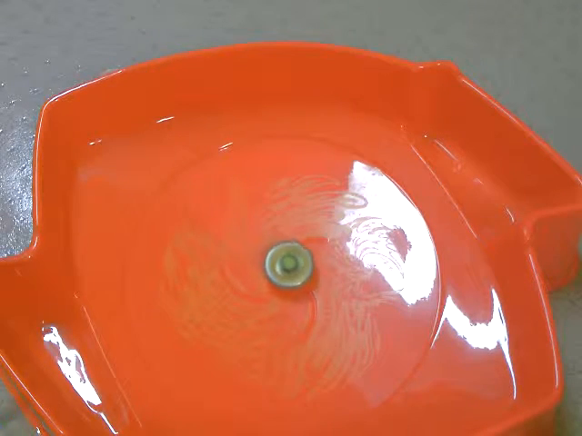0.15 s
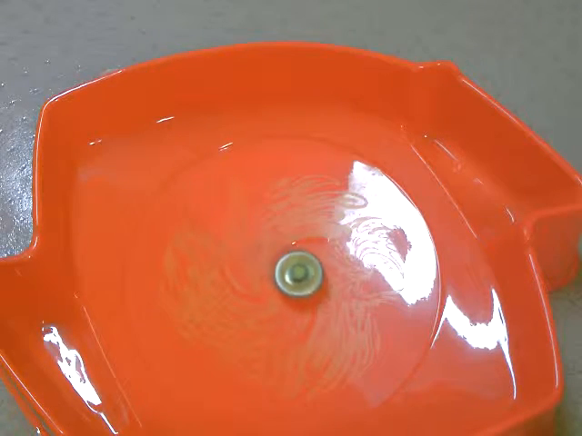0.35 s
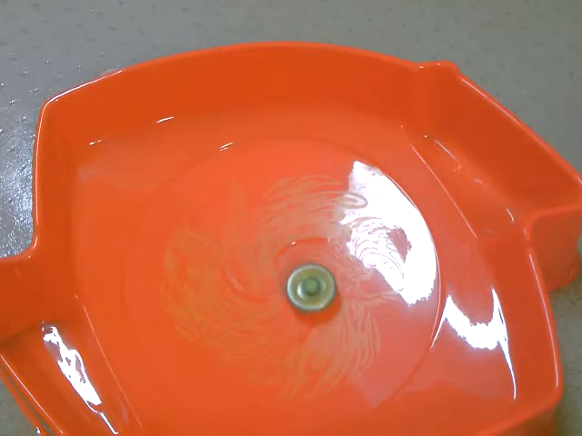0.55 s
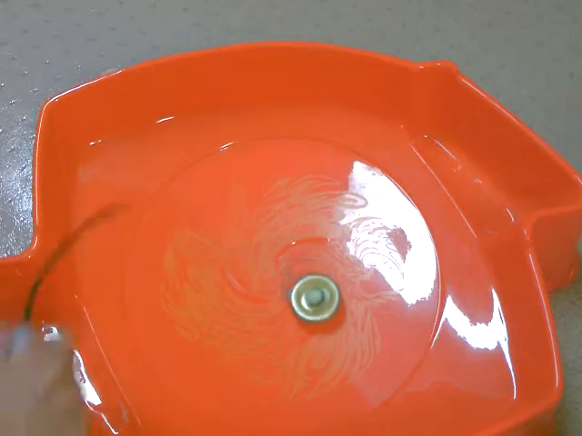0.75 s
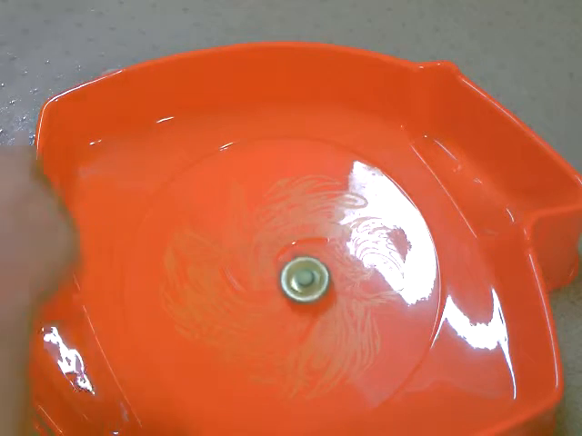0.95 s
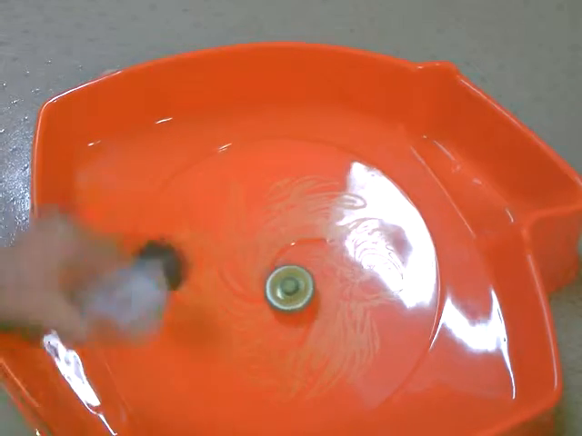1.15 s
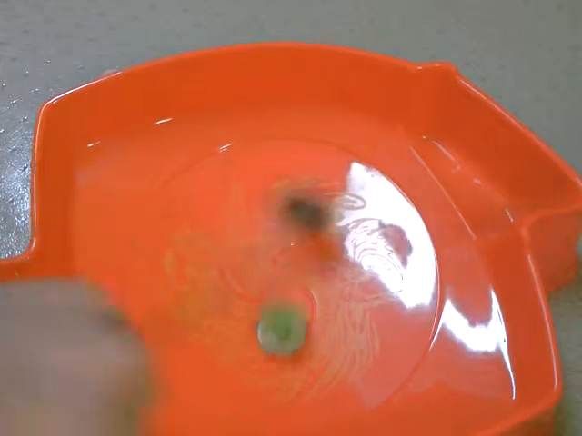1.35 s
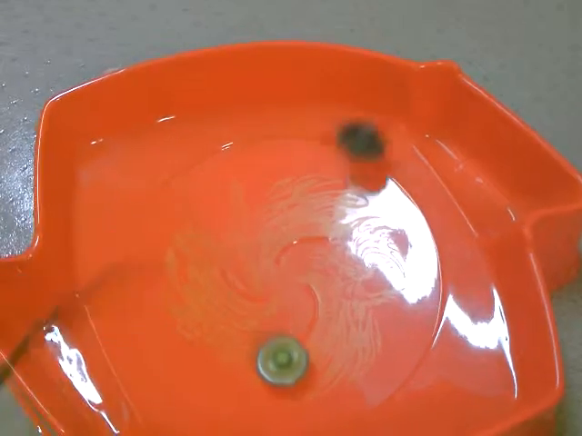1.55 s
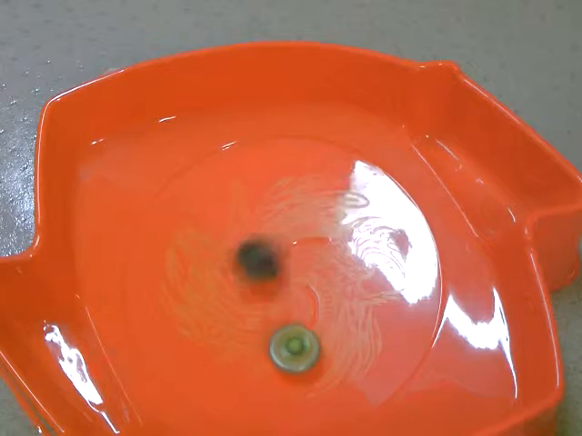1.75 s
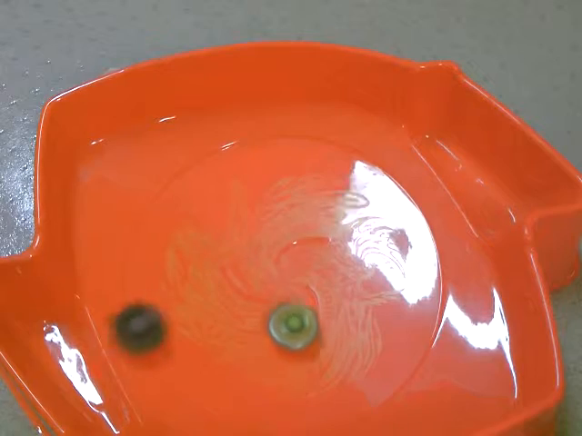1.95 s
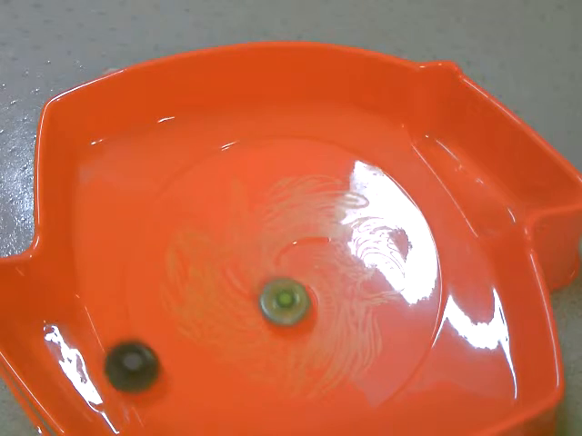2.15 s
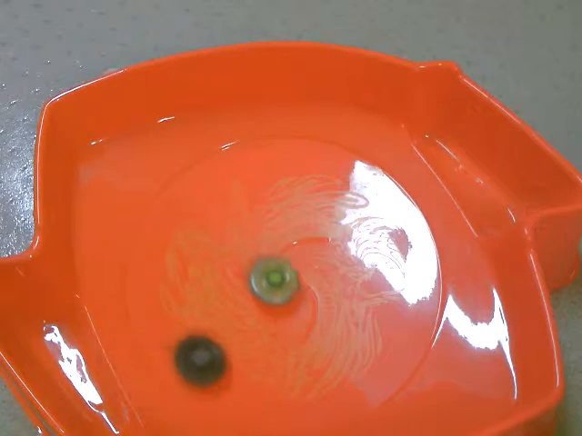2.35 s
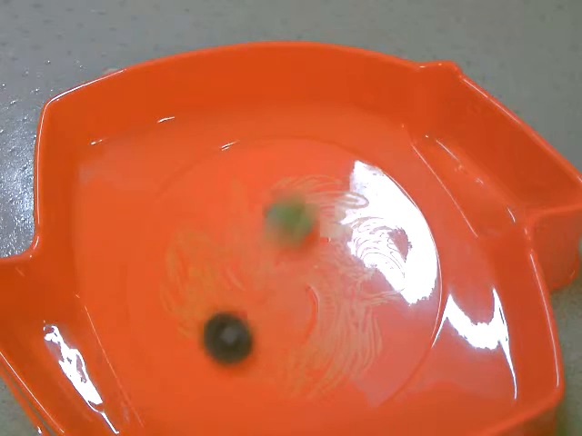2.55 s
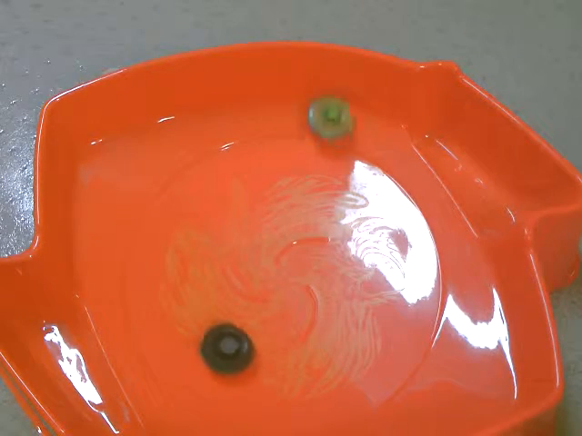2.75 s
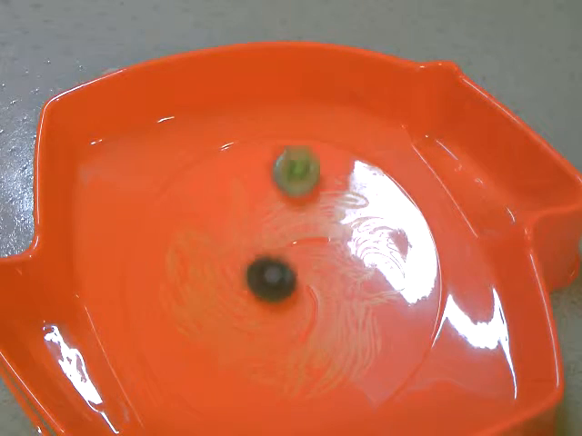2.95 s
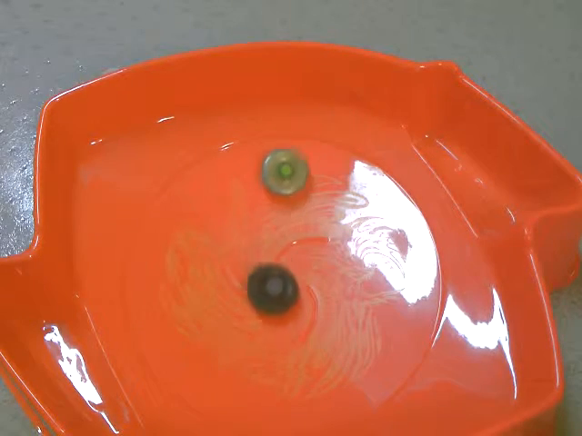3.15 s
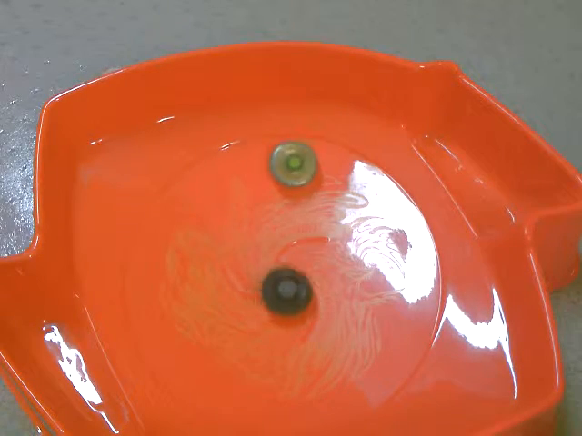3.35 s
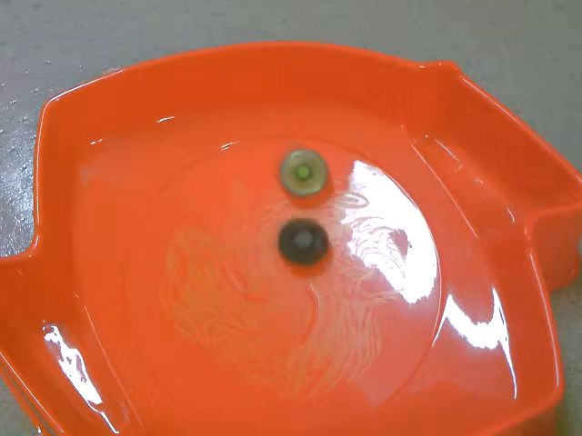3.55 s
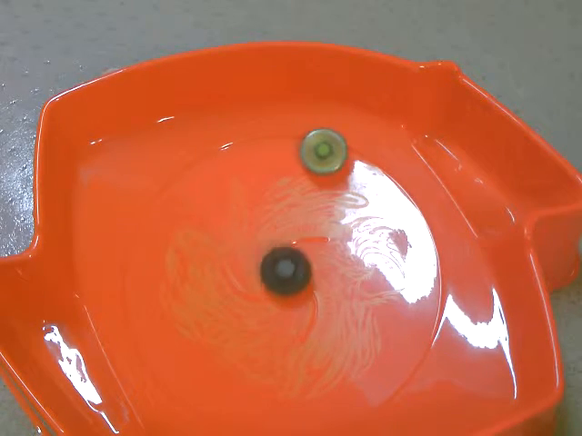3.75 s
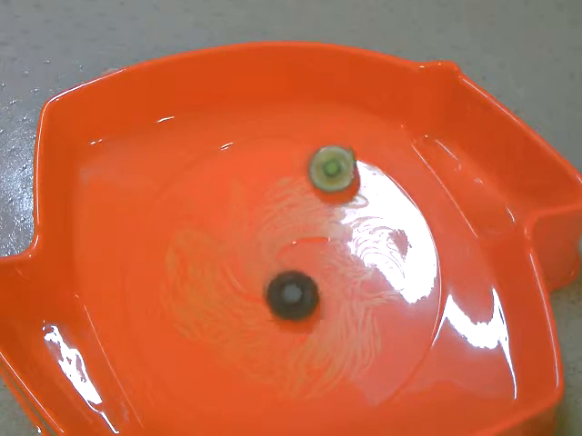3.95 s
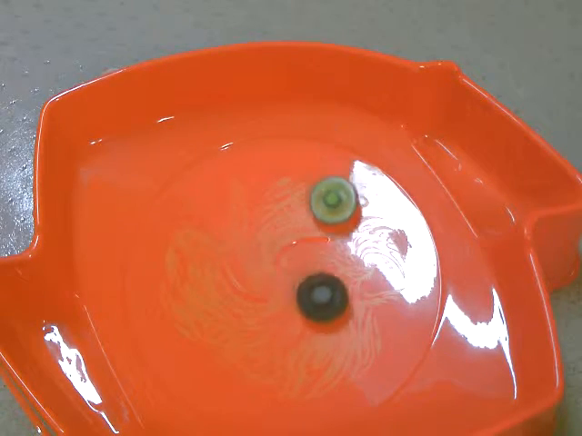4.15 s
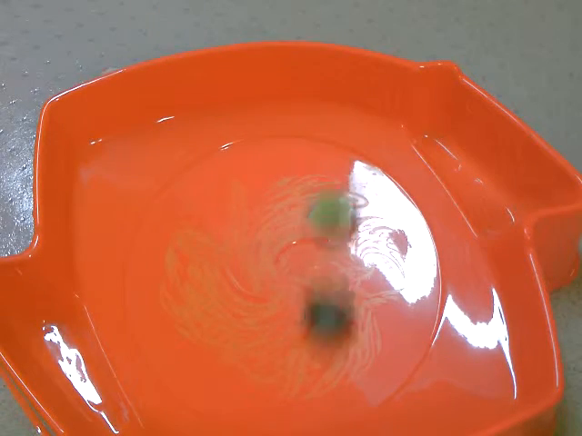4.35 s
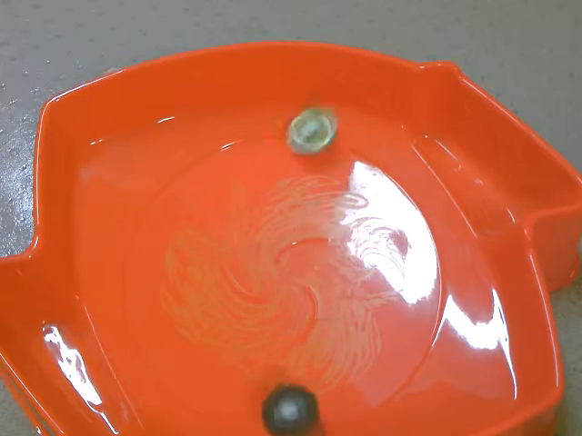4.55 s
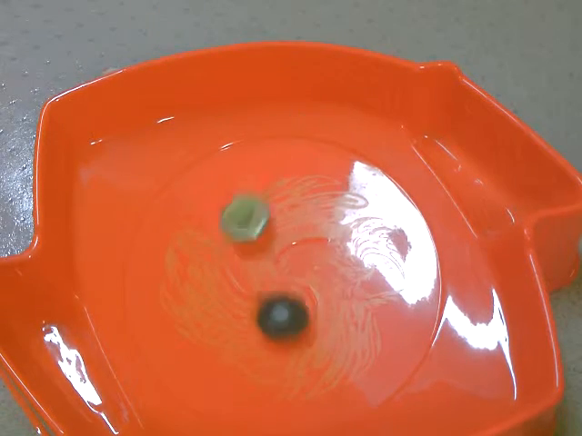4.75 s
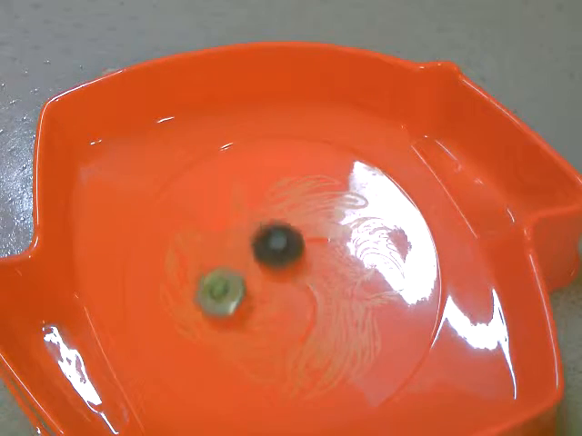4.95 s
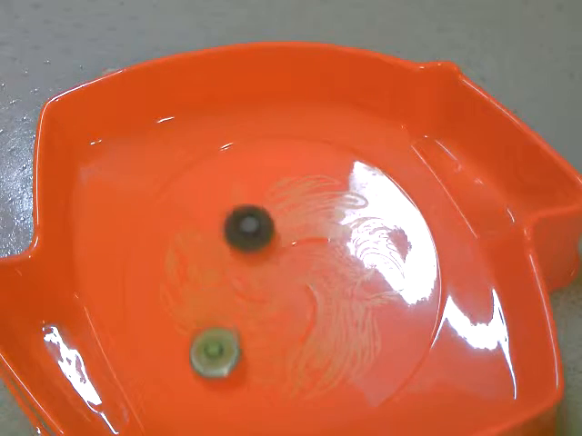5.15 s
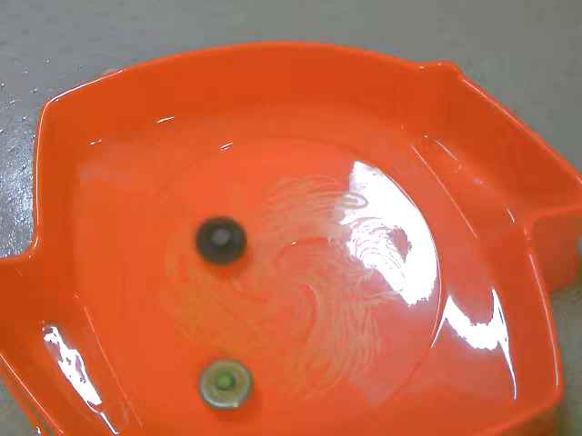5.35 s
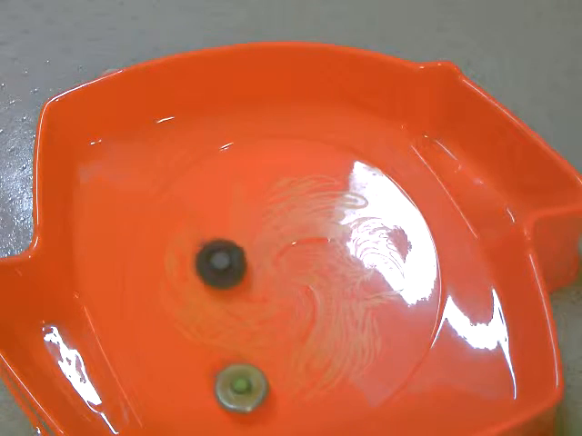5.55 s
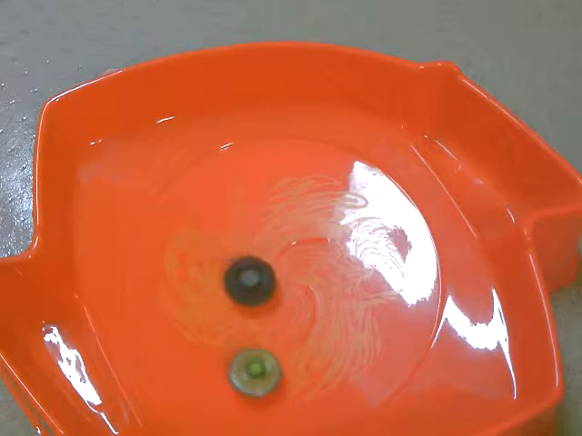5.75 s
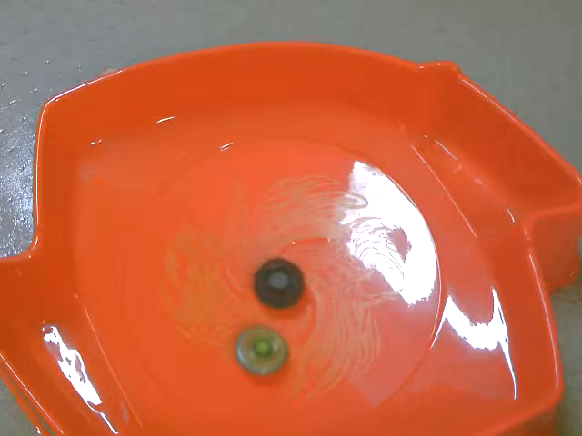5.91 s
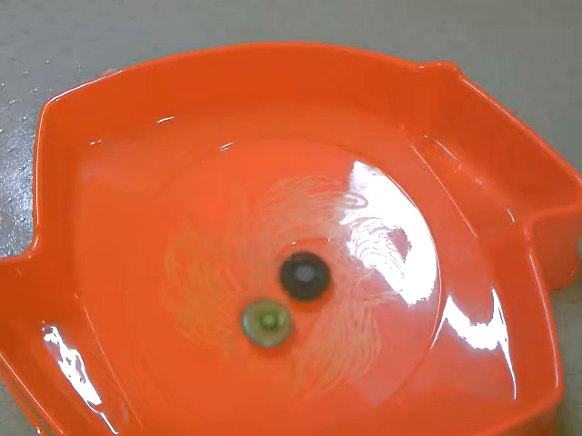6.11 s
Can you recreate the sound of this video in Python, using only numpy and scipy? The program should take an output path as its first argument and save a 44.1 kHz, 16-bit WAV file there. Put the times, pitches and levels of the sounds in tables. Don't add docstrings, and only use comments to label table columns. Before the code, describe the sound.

A small hard-walled room, heard closely through a thin little microphone with faint steady hiss. From 0 to 0.5 s a toothed strip is fed into a hollow plastic launcher: faint clicks, then a run of hard snaps from 0.25 to 0.42 with buzzing tails. A spinning top's tip ticks and rumbles softly on plastic until a very quick, bright ratcheting rip at about 1.2. The second top slams into the bowl at 1.27, with hollow knocks at 1.5, 1.6 to 1.7, 1.8 and 1.9, then weakening hops and rolling. Metal rims clash at 2.7, with bowl knocks to 3.0; again at 3.23, followed by rapid fluttering scuffs; a hard snap comes at 3.8. After near-quiet rolling, the last clash at 4.52 rings high and shimmering, then strong bowl thuds at 4.62 to 4.69 dwindle into pattering bounces until 5.5, leaving faint hum and a small tick near 5.8.

```python
import sys
import numpy as np
from scipy import signal
from scipy.fft import rfft, irfft
from scipy.io import wavfile

SR = 44100
rng = np.random.default_rng(int(sys.argv[2]) if len(sys.argv) > 2 else 0)


def amplitude_ratio(level_db):
    exponent = np.asarray(level_db, float) / 20
    return 10 ** exponent


def inscribe(sig):
    pcm = np.round(np.clip(np.atleast_2d(sig).T, -1, 1) * 32767)
    wavfile.write(sys.argv[1], SR, pcm.astype(np.int16))


N = 272538

# t/s, tooth rattle level/dB
RIP = [
    (1.17, -43.5),
    (1.238, -16),
    (1.25, -29.5),
    (1.28, -47),
]
# f/Hz, level/dB, time to fall 60 dB/s
BOWL = [(398.6, -8, 0.13), (493, -6, 0.21), (525, -2, 0.23), (568.5, 1.5, 0.12), (610, 1, 0.1),
        (675, 2.5, 0.052), (718, -5, 0.14), (710, 1.5, 0.099), (772, 3.5, 0.17), (830, -8, 0.19),
        (897, 11, 0.045), (970, -4.5, 0.057), (1030, -2.5, 0.055), (1010, 12, 0.028), (1067, 2, 0.14),
        (1200, 6.5, 0.027), (1240, -10.5, 0.068), (1294, 6.5, 0.062), (1607, 17, 0.0077)]
# f/Hz, level/dB, time to fall 60 dB/s
WALL = [(150, -15.5, 0.063), (225, -15, 0.06), (297.4, -17.5, 0.094)]


def rms_one(x):
    return x / np.sqrt(np.mean(x ** 2) + 1e-20)


def curve(rows):
    s, level_db = np.transpose(rows)
    return amplitude_ratio(np.interp(np.arange(N) / SR, s, level_db, left=-140, right=-140))


def ring(clicks, hz, t60):
    decay, turn = amplitude_ratio(-60 / (t60 * SR)), 2 * np.pi * hz / SR
    return signal.lfilter([0, np.sin(turn)], [1, -2 * decay * np.cos(turn), decay * decay], clicks + 1e-18)


def strike(times, levels_db, modes, spread_db):
    at = np.round(times * SR).astype(int)
    out = np.zeros(N)
    chance = rng.standard_normal((len(at), len(modes), 2))
    for k, (hz, mode_db, t60) in enumerate(modes):
        sign = np.where(chance[:, k, 1] > 0, 1, -1)
        clicks = np.zeros(N)
        clicks[at] = amplitude_ratio(levels_db + mode_db + spread_db * chance[:, k, 0]) * sign
        out += ring(clicks, hz, t60)
    return out


def snaps(times, levels_db, low_hz, high_hz, t60, rise_s):
    length = 4096
    out, t = np.zeros(N + length), np.arange(length) / SR
    shape = amplitude_ratio(-60 * t / t60) * np.minimum(t / rise_s, 1)
    band = signal.butter(2, [low_hz, min(high_hz, .45 * SR)], "band", fs=SR, output="sos")
    bursts = signal.sosfilt(band, rng.standard_normal((len(times), length)) * shape)
    for s, level_db, burst in zip(times, levels_db, bursts):
        start = round(s * SR)
        out[start:start + length] += amplitude_ratio(level_db) * burst / np.abs(burst).max()
    return out[:N]


def grains(per_s, uneven_db):
    sizes = amplitude_ratio(uneven_db * np.minimum(rng.exponential(1, N), 4)) * rng.choice([-1, 1], N)
    return sizes * (rng.random(N) < per_s / SR)


def notes(rows, rise_s):
    length = 16384
    out, t = np.zeros(N + length), np.arange(length) / SR
    for s, level_db, hz, t60 in rows:
        start = round(s * SR)
        fade = amplitude_ratio(level_db - 60 * t / t60) * np.minimum(t / rise_s, 1)
        out[start:start + length] += fade * np.sin(2 * np.pi * hz * t)
    return out[:N]


def pushes(times, levels_db, pitches_hz, swell_s):
    length = 2048
    out, t = np.zeros(N + length), np.arange(length) / SR
    for s, level_db, hz in zip(times, levels_db, pitches_hz):
        start = round(s * SR)
        swing = t / swell_s * np.exp(1 - t / swell_s) * np.sin(2 * np.pi * hz * t)
        out[start:start + length] += amplitude_ratio(level_db) * swing
    return out[:N]


def launcher():
    # t/s, peak level/dB, case ring level/dB, strip ring level/dB
    ratchet = [(0.0034, -30, -9, -15), (0.0114, -33, 3, -21), (0.022, -29, -15, -22),
               (0.03, -23.5, -8.5, -17), (0.0446, -30, -22, -19), (0.1777, -27, -10, -12),
               (0.182, -32, -8, -21), (0.2547, -8.5, -31, -13), (0.2569, -9, -17, -22),
               (0.2707, -5.5, -24, -21), (0.2966, -7.5, -27, -29), (0.3314, -9, -19, -31),
               (0.3683, -10, -22, -15), (0.413, -9, -26, -14), (0.4154, -16, -16, -3),
               (0.519, -31, -16, -30), (1.188, -31.5, -19.5, 1.5), (1.194, -47, -20.5, 0),
               (1.203, -36, 0, 11), (1.2082, -31, -18, 1.5), (1.2134, -20, -9, -6), (1.2214, -17, 0, -1),
               (1.224, -17, -7, -2), (1.2314, -21, -15, -16), (1.2334, -8.5, -10, -13),
               (1.2354, 0, -13, -15), (1.2374, -12.5, -17, 1.5), (1.244, -21, 4, -9), (1.252, -33, 7, -12)]
    # f/Hz, level/dB, time to fall 60 dB/s
    case_modes = [(1383, -26, 0.0065), (1570, 3.5, 0.013), (1746, 5.5, 0.0029)]
    # f/Hz, level/dB, time to fall 60 dB/s
    strip_modes = [(2524, -4.5, 0.02), (2970, -3, 0.023), (3340, -8, 0.022)]
    s, peak_db, case_db, strip_db = np.transpose(ratchet)
    treble_db = -23.5 + 0.89 * peak_db + 10 * (s > RIP[0][0])
    snap = snaps(s, peak_db - 5.5, 1510, 4860, t60=0.021, rise_s=0.00024)
    snap += snaps(s, treble_db + 6.0, 6000, 13000, t60=0.046, rise_s=0.00032)
    buzz = snaps(s, -20.5 + 0.8 * peak_db, 2000, 3500, t60=.09, rise_s=.002)
    case = strike(s, peak_db + case_db, case_modes, spread_db=1.0)
    strip = strike(s, peak_db + strip_db, strip_modes, spread_db=-0.5)
    teeth = grains(per_s=5100, uneven_db=0.0)
    rattle = rms_one(signal.lfilter(*signal.butter(2, [1300, 3800], "band", fs=SR), teeth))
    return snap + buzz + case + strip + slow_teeth() + amplitude_ratio(-7.5) * curve(RIP) * rattle


def slow_teeth():
    # t/s, case level/dB, case f/Hz, buzz level/dB, buzz f/Hz
    slow = [
        (0.18, -26, 1610, -44, 2700),
        (.2565, -26, 1900, -21, 2880),
        (0.2722, -12.5, 1670, -21, 3000),
        (0.2963, -11.5, 1560, -25, 2850),
        (0.3318, -15, 1510, -25.5, 2500),
        (0.3702, -14.5, 1880, -24, 2540),
        (0.4135, -12, 1760, -23, 2700),
    ]
    out = notes([(s, level_db, hz, .016) for s, level_db, hz, _, _ in slow], rise_s=0.00041)
    for s, _, _, buzz_db, hz in slow:
        out = out + snaps([s], [buzz_db], 0.835 * hz, 1.08 * hz, t60=0.15, rise_s=.002)
    return out


def clashes():
    # t/s, peak level/dB, rattle level/dB, pulse level/dB, level of the high blurred ring/dB
    hits = [
        (2.692, -11, -14, -9, -22.5),
        (3.2264, -7.5, -12.5, -14, -17.5),
        (3.8075, -4, -12, -10, -17),
        (4.519, -7, -22, -5, -14),
    ]
    # t/s, level/dB, f/Hz, time to fall 60 dB/s
    bodies = [(2.692, -24.5, 2220, 0.048), (2.692, -14.5, 3820, 0.014), (2.692, -29.5, 4440, 0.082),
              (2.692, -17, 6200, 0.035), (2.692, -39, 2560, .05), (3.2265, -28, 2890, 0.035),
              (3.2265, -43, 6400, 0.044), (3.2265, -37, 2250, 0.059), (3.2265, -37, 8200, 0.037),
              (3.808, -32.5, 2220, 0.076), (3.808, -23, 4080, 0.015), (3.808, -34, 6140, 0.036),
              (3.808, -49, 7550, 0.034), (3.808, -29, 9700, .02), (3.2265, -19, 9520, 0.03),
              (1.2125, -19, 2950, .03), (1.2215, -19.5, 1560, 0.039), (1.2345, -13.5, 1550, 0.027),
              (1.235, -4.5, 2630, 0.023), (1.238, -13, 3230, 0.029), (4.519, -25, 2908, 0.053),
              (4.519, -33, 2660, 0.1), (4.519, -28.5, 6500, 0.087), (4.519, -45, 7500, .04),
              (4.519, -36, 8600, 0.026), (4.519, -25, 9470, 0.044), (2.8595, -19.5, 2330, .02),
              (1.9, -24, 2920, 0.014), (1.677, -22, 1510, .03)]
    s, peak_db, rattle_db, pulse_db, cluster_db = np.transpose(hits)
    snap = snaps(s, peak_db, 2000, 10800, t60=0.0042, rise_s=0.00015)
    rattle = snaps(s, peak_db + rattle_db, 940, 6300, t60=0.011, rise_s=0.00037)
    cluster = snaps(s, cluster_db, 5400, 6200, t60=0.056, rise_s=0.001)
    contact_s = .0001
    pulse = pushes(s, pulse_db, s * 0 + 0.33 / contact_s, swell_s=contact_s)
    return snap + rattle + cluster + notes(bodies, rise_s=0.00026) + pulse


def rims():
    # t/s, level/dB, f/Hz, time to fall 60 dB/s
    rim_notes = [(2.692, -40, 5670, .16), (2.692, -44, 5755, .14), (3.808, -38, 5696, .2),
                 (3.808, -44, 5550, .2), (3.2265, -44, 5502, .3), (3.2265, -40, 5550, .28),
                 (3.2265, -48, 5599, .3), (3.2265, -48, 5642, .3), (3.2265, -35, 5690, .42),
                 (4.519, -45, 5405, .3), (4.519, -44, 5457, .25), (4.519, -30, 5490, .34),
                 (4.520, -30, 5503, .2), (4.521, -30, 5545, .3), (4.523, -33, 5588, .3),
                 (4.525, -37, 5636, .3), (4.519, -30, 5675, .36), (4.521, -36, 5690, .25)]
    return notes(rim_notes, rise_s=.003)


def knocks():
    # f/Hz, level/dB, time to fall 60 dB/s
    tip_modes = [(2330, -7, 0.033), (2850, -3.5, 0.019), (3860, -2, 0.0079)]
    # t/s, level/dB, f/Hz, time to fall 60 dB/s
    drums = [(1.496, -37, 293, .33), (1.27, -14, 480, .05), (1.288, -22, 330, .08),
             (1.6225, -11, 1010, .045), (1.627, -22, 400, .07), (1.632, -22, 490, .08),
             (1.68, -16, 630, .04), (1.79, -24, 950, .03), (1.9, -28, 950, .05), (1.907, -30, 560, .04),
             (2.859, -24, 900, .03), (2.862, -28, 480, .08), (2.9395, -13, 680, .04),
             (2.951, -22, 1500, .05), (2.94, -22, 1450, .03), (2.951, -26, 1050, .04),
             (3.0285, -20, 640, .05), (3.04, -36, 560, .15), (4.6175, -14, 750, .04),
             (4.622, -24, 560, .06), (4.675, -12, 680, .04)]
    # t/s, level/dB, f/Hz, time to fall 60 dB/s
    chatter = [(1.975, -33, 1256, .05), (2.02, -36, 770, .05), (2.09, -35, 1010, .03),
               (2.236, -32, 940, .03), (2.343, -35, 1000, .03), (2.362, -40, 900, 0.033),
               (2.551, -43, 890, 0.032), (4.752, -31, 600, 0.037), (4.8, -32, 640, .04),
               (4.817, -29, 1060, .03), (4.845, -30, 1010, .03), (4.872, -31, 1090, .04),
               (4.92, -33, 895, 0.027), (4.966, -34, 800, 0.036), (5.025, -42, 905, .03),
               (5.07, -36, 990, .04), (5.135, -37, 1040, .03), (5.23, -43, 950, .03),
               (5.253, -43, 1000, .03), (5.37, -48, 900, .03)]
    s, thud_db, clack_db, tick_db, wall_db, hz = contacts()
    push = pushes(s, thud_db - 4.5, hz, swell_s=0.0018)
    modes = strike(s, thud_db - 21.5, BOWL, spread_db=1.5) + strike(s, wall_db + 0.5, WALL, spread_db=0.0)
    soft = signal.lfilter(*signal.butter(2, 1500, fs=SR), modes)
    clack = snaps(s, clack_db + 2.0, 900, 2820, t60=0.043, rise_s=0.00054)
    tick = snaps(s, tick_db - 0.5, 3500, 13400, t60=0.014, rise_s=0.0001)
    stem = strike(s, tick_db - 8.5, tip_modes, spread_db=6.5)
    return push + soft + clack + tick + stem + notes(drums + chatter, rise_s=0.00062)


def contacts():
    # t/s, thud level/dB, clack level/dB, tick level/dB, push f/Hz
    slams = [(1.2665, -12.5, -25, -42, 430), (1.273, -9, -42, -41, 710), (1.286, -13, -34, -46, 760),
             (1.488, -23.5, -58, -14, 1090), (1.494, -20, -38, -19, 1030), (1.622, -15, -16, -19.5, 895),
             (1.626, -7.5, -48, -26, 688), (1.677, -12.5, -15.5, -17, 830), (1.68, -14.5, -25, -21, 615),
             (1.79, -14, -28.5, -28.5, 615), (1.9, -29, -29.5, -38, 830), (1.907, -23, -63, -69, 1040),
             (2.704, -37.5, -34, -47, 570), (2.737, -54, -31.5, -36, 596), (2.851, -26, -44, -61, 616),
             (2.859, -29, -29, -30, 480), (2.859, -16, -52, -46, 610), (2.902, -32, -36.5, -39, 940),
             (2.938, -18, -17, -25.5, 675), (2.941, -17, -23.5, -21.5, 685), (3.028, -24, -38.5, -68, 616),
             (4.6172, -12, -23.5, -32, 720), (4.6422, -12, -23.5, -31, 553),
             (4.671, -43, -13.5, -22.5, 1080), (4.675, -5, -30, -23, 610), (4.686, -12.5, -60, -27, 644)]
    # t/s, thud level/dB, tick level/dB, push f/Hz
    bounces = [(1.964, -25.5, -39, 960), (2.009, -27, -40, 1036), (2.038, -32, -68, 774),
               (2.069, -34, -46, 800), (2.102, -38, -70, 1030), (2.151, -30.5, -43, 1030),
               (2.191, -31.5, -58, 1010), (3.07, -33.5, -97, 525), (3.113, -32, -46, 1084),
               (3.139, -35, -73, 790), (4.785, -24, -31, 570), (4.855, -28.5, -38.5, 940),
               (4.909, -26, -68, 1000), (4.954, -29, -62, 1120), (4.985, -31.5, -64, 820),
               (5.041, -36.5, -52, 990), (5.061, -26.5, -41, 924), (5.119, -34, -46, 1010),
               (5.168, -36.5, -47, 910)]
    # t/s, thud level/dB, push f/Hz
    trips = [(0.552, -40, 470), (0.648, -43, 603), (0.773, -31, 950), (0.851, -35, 860), (0.934, -38, 1030),
             (0.962, -35.5, 530), (2.462, -41, 805), (2.468, -27.5, 730), (2.512, -47, 880),
             (2.583, -50, 666), (2.595, -37.5, 465), (2.62, -39, 470), (2.64, -38.5, 610),
             (3.854, -37, 1060), (4.292, -36.5, 840), (5.794, -39.5, 970)]
    # t/s, level/dB
    flexes = [(1.267, -21), (1.488, -15.5), (1.622, -9.5), (1.677, -15), (1.79, -23), (1.9, -19),
              (1.964, -24), (2.009, -29), (2.038, -32), (2.859, -30), (2.938, -30), (4.292, -41),
              (4.675, -13), (4.785, -25), (5.061, -35.5), (5.793, -40)]
    rows = slams + [(s, thud, thud - 7, tick, hz) for s, thud, tick, hz in bounces]
    rows += [(s, thud, thud - 7.5, thud - 41, hz) for s, thud, hz in trips]
    in_order = sorted(rows, key=lambda row: round(row[0], 2))
    s, thud_db, clack_db, tick_db, hz = np.transpose(in_order)
    wall_db = thud_db - 15.5
    for at, flex_db in flexes:
        wall_db[np.argmin(np.abs(s - at))] = flex_db
    return s, thud_db, clack_db, tick_db, wall_db, hz


def rolling():
    # t/s, peak level/dB
    scuffs = [(3.309, -49), (3.3352, -34.5), (3.3603, -40), (3.3834, -35.5), (3.4054, -50), (3.4296, -39),
              (3.454, -39), (3.4775, -41), (3.5004, -39.5), (3.5234, -42), (3.5453, -40), (3.569, -42),
              (3.5912, -46), (3.6132, -44.5), (3.6374, -45), (3.6586, -50), (3.7289, -55), (3.7539, -54),
              (3.7784, -41.5), (3.9724, -48.5)]
    # t/s, peak level/dB
    nicks = [
        (0.666, -41.5),
        (0.725, -48),
        (.773, -48),
        (0.812, -40.5),
        (.936, -62),
        (.9585, -58),
        (.989, -46.5),
        (1.037, -46),
        (1.087, -41.5),
        (1.465, -62),
    ]
    bumps, dealt = grains(per_s=2400, uneven_db=3.5), rng.integers(0, 3, N)
    drive, scrape = bumps * tip_load()
    rumble = np.zeros(N)
    for k, (hz, level_db, t60) in enumerate(WALL + BOWL):
        rumble += amplitude_ratio(level_db) * ring(drive * (dealt == k % 3), hz, 0.51 * t60)
    unit = sum(amplitude_ratio(level_db) * np.sqrt(t60) for _, level_db, t60 in BOWL) * np.std(bumps)
    scratch = signal.lfilter(*signal.butter(1, [900, 3500], "band", fs=SR), scrape) / np.std(bumps)
    nick = snaps(*np.transpose(nicks), 1500, 4100, t60=0.025, rise_s=0.00047)
    s, peak_db = np.transpose(scuffs)
    scuff = snaps(s, peak_db + 0.5, 910, 3300, t60=0.019, rise_s=0.00015)
    return amplitude_ratio(-15.0) * rumble / unit + scratch + nick + scuff


def tip_load():
    # touch-down t/s, lift-off t/s, rumble level at start/dB, at end/dB, scratch against it/dB
    runs = [(0, 0.14, -42, -71, -2), (0.654, 0.894, -44, -46.5, -9), (0.928, 1.16, -45, -46.5, -10.5),
            (1.213, 1.517, -33, -63.5, -29), (1.817, 2.362, -52, -43, -15.5), (2.468, 2.538, -38, -51, -22),
            (2.608, 3.15, -48, -41.5, -12), (3.163, 3.946, -44.5, -50, -20),
            (4.526, 4.667, -41.5, -63, -15), (4.763, 5.088, -37, -49.5, -18),
            (5.097, 5.485, -46, -60.5, -18)]
    touch_s, lift_s = 0.044, 0.083
    t = np.arange(N) / SR
    hum_db = np.where(t < RIP[-1][0], -63.5, -59.5)
    power = amplitude_ratio(2 * hum_db) * amplitude_ratio(np.array([[0], [2 * -13.5]]))
    for start, end, first_db, last_db, scratch_db in runs:
        gate = np.clip(np.minimum((t - start) / touch_s, (end - t) / lift_s) + .5, 0, 1)
        run_db = np.interp(t, [start, end], [first_db, last_db]) + np.array([[0], [scratch_db]])
        power = power + (gate * amplitude_ratio(run_db)) ** 2
    return np.sqrt(power)


def hiss():
    # f/Hz, level per Hz/dB
    color = [(35, -58.5), (60, -49), (319, -15), (660, -2.5), (703, -13), (1010, -6.5), (1100, -12.5),
             (1620, -9.5), (4070, -20), (7900, -27.5), (10000, -23.5), (13000, -86), (22000, -120)]
    hz, level_db = np.transpose(color)
    shape = amplitude_ratio(np.interp(np.log(np.arange(N // 2 + 1) * SR / N + 1), np.log(hz), level_db))
    return amplitude_ratio(-59) * rms_one(irfft(rfft(rng.standard_normal(N)) * shape, N))


def room(x):
    low_t60_s, high_t60_s = 0.2, 0.22
    t, noise = np.arange(16384) / SR, rng.standard_normal((2, 16384))
    low = signal.lfilter(*signal.butter(2, 1500, fs=SR), noise[0]) * amplitude_ratio(-60 * t / low_t60_s)
    high = signal.lfilter(*signal.butter(2, 1500, "high", fs=SR), noise[1]) * amplitude_ratio(-60 * t / high_t60_s)
    tail = (low + high) * np.clip((t - .002) / 0.0084, 0, 1)
    return signal.fftconvolve(x, tail / np.sqrt(np.sum(tail ** 2)))[:N]


def scene():
    bright = signal.sosfilt(signal.butter(3, 1150, "high", fs=SR, output="sos"), launcher())
    bright += signal.sosfilt(signal.butter(1, 1000, "high", fs=SR, output="sos"), clashes())
    dull = knocks() + rolling()
    echo = amplitude_ratio(-11.5) * room(bright + amplitude_ratio(2.5) * dull)
    return (bright + dull + echo + rims() + hiss())[None]


def roll_off(x):
    return signal.sosfilt(signal.butter(12, 10310, fs=SR, output="sos"), x)


def record(dry):
    thin = signal.sosfilt(signal.butter(2, 210, "high", fs=SR, output="sos"), dry)
    rounded = .9 * np.tanh(thin / .9)
    cut = signal.sosfilt(signal.cheby2(20, 50, 9850, fs=SR, output="sos"), rounded)
    return roll_off(cut)


dry = scene()
out = record(dry)
inscribe(out)
```